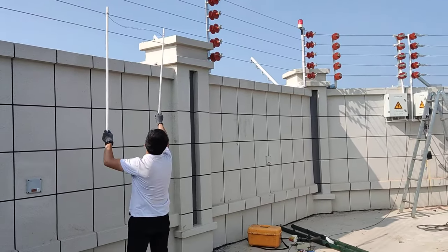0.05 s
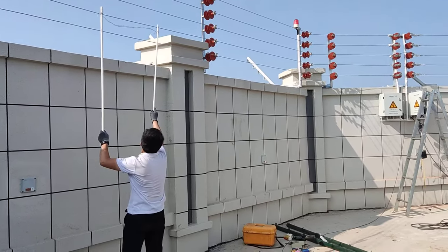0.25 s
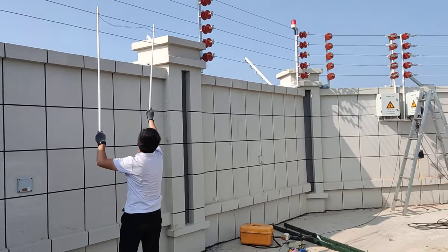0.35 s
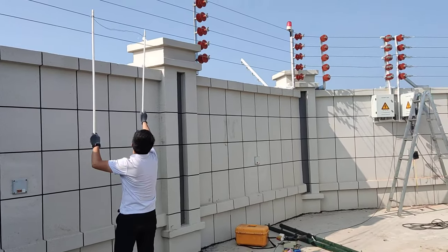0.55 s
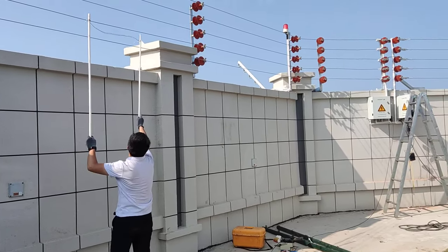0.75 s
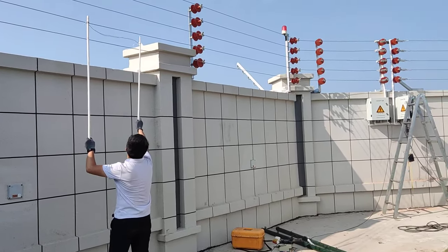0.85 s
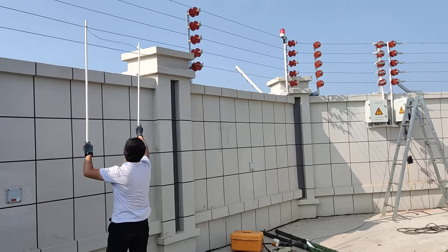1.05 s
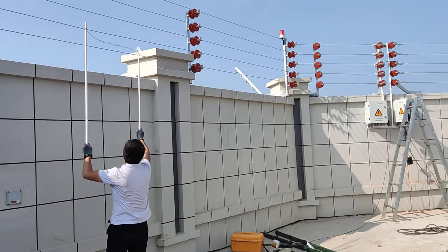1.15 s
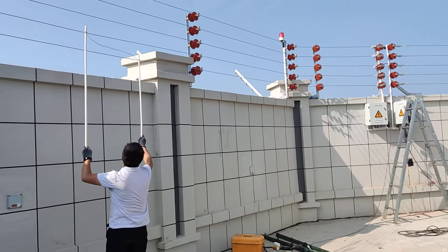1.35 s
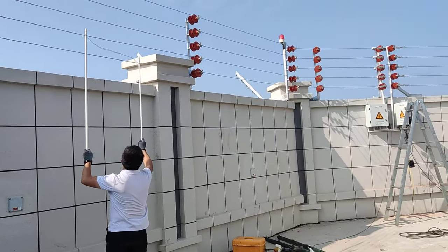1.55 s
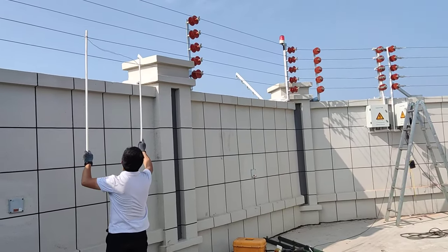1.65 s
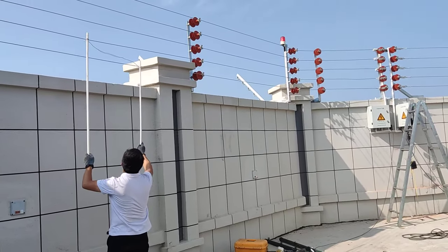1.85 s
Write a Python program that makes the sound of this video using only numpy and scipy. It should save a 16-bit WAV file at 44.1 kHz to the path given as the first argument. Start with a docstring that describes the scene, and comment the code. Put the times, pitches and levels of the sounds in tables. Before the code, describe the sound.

An electric fence wire crackles briefly with sparks while wind buffets the microphone.

```python
"""Arcing fence wire in wind.

A fence wire on top of a tiled yard wall arcs for a moment: a short volley of sparks, each echoed
by wall and ground. Gusts buffet the two microphone ports of a phone separately, over a faint
outdoor hiss. The phone's limiter holds down the loudest peaks."""
import sys
import numpy as np
from scipy import signal
from scipy.fft import rfft, irfft
from scipy.io import wavfile
from scipy.ndimage import uniform_filter1d, minimum_filter1d

SR = 44100
rng = np.random.default_rng(int(sys.argv[2]) if len(sys.argv) > 2 else 0)


def wrap_up_sound(samples):
    """Save the sound to the file named by the first command line argument, as 16-bit audio."""
    columns = np.atleast_2d(samples).T
    # keep every value between -1 and 1, then stretch to whole-number steps
    tamed = np.clip(columns, -1, 1)
    steps = np.round(tamed * 32767).astype(np.int16)
    wavfile.write(sys.argv[1], SR, steps)


N = 83790
LEFT, RIGHT = 0, 1


def undb(db):
    """dB to gain."""
    return 10 ** (np.asarray(db) / 20)


def curve(table, t, column=1):
    """One column of a time table, linearly interpolated."""
    rows = np.array(table, float)
    return np.interp(t, rows[:, 0], rows[:, column])


def colour(table, hz):
    """Gain from (Hz, dB) points on a log-frequency axis."""
    rows = np.array(table, float)
    return undb(np.interp(np.log(np.maximum(hz, 1)), np.log(rows[:, 0]), rows[:, 1]))


def walk(rate_hz, size):
    """Random wander, spread near 1."""
    hold = max(int(SR / rate_hz), 1)
    steps = np.repeat(rng.standard_normal(size // hold + 1), hold)
    return np.sqrt(3 / 2) * uniform_filter1d(steps, hold)[:size]


def outdoor_hiss(port):
    """Distant hiss in three bands that flicker independently."""
    # Each row: frequency in Hz, relative level in dB.
    colour_left = [(300, 5.5), (1100, -0.5), (1500, 4), (2500, -0.5), (5800, -5), (7600, -13.5),
                   (9000, -11.5), (11000, -18.5), (15500, -20)]
    colour_right = [(300, 6), (1100, 2), (1600, 4), (2500, 7.5), (4200, 1), (5800, 6), (7600, -7),
                    (9000, -4.5), (15500, -22)]
    # Each row: time in seconds, level of the 2-12 kHz range in dB.
    level_left = [(0.02, -55.5), (0.4, -50.5), (0.6, -53), (1.05, -51), (1.55, -55.5), (1.88, -53)]
    level_right = [(0.02, -48.5), (0.15, -46), (0.24, -45), (0.4, -53), (0.6, -48), (0.73, -52),
                   (0.85, -50), (1.88, -48)]
    shape, level = (colour_left, level_left) if port == LEFT else (colour_right, level_right)
    flicker_db = 1.0
    hz = np.arange(N // 2 + 1) * SR / N
    spectrum = rfft(rng.standard_normal(N)) * colour(shape, hz) * hz / (hz + 100)
    spectrum *= N / np.sqrt(2 * np.sum(np.abs(spectrum[(hz > 2000) & (hz < 12000)]) ** 2))
    band = np.digitize(hz, [2000, 7000])
    hiss = sum(irfft(spectrum * (band == k), N) * undb(flicker_db * walk(8.25, N)) for k in range(3))
    return hiss * undb(curve(level, np.arange(N) / SR))


def wind(port):
    """Eddies as smooth pressure bumps, narrower in strong gusts; the port sheds deep bass and treble."""
    # Each row: time in seconds, gust level in dB, eddy half-width in ms.
    gusts_left = [(0.0, -29, 3.2), (0.105, -25.5, 1.9), (0.155, -34.5, 2.5), (0.22, -35, 1.3),
                  (0.269, -16, 2.3), (0.314, -20.5, 0.83), (0.369, -33, 1.4), (0.404, -13.5, 1.17),
                  (0.444, -33, 1), (0.469, -15.5, 1.6), (0.494, -39, 1.9), (0.574, -22, 1.9),
                  (0.624, -29, 1.8), (0.644, -22, 0.7), (0.698, -40, 4.1), (0.753, -36, 7),
                  (0.828, -14, 1.7), (0.873, -27.5, 1.55), (0.978, -23.5, 1.24), (1.048, -16.5, 1.53),
                  (1.162, -32, 2.4), (1.262, -20, 1.8), (1.297, -38.5, 1.8), (1.342, -50, 3.3),
                  (1.392, -31, 2.0), (1.467, -26.5, 2.2), (1.522, -43, 3.4), (1.586, -30, 3.2),
                  (1.676, -44.5, 3), (1.796, -32, 2.4), (1.831, -19.5, 1.7), (1.866, -33, 2.5),
                  (1.896, -26.5, 2.1)]
    gusts_right = [(0.0, -32.5, 1.6), (0.125, -41, 3.9), (0.155, -23, 3.4), (0.185, -38.5, 1.8),
                   (0.215, -24.5, 0.54), (0.244, -31, 1.8), (0.27, -13.5, 2.8), (0.309, -6.5, 0.49),
                   (0.337, -15.5, 0.51), (0.352, -8, 0.42), (0.365, -21.5, 0.77), (0.378, -10.5, 0.59),
                   (0.399, -15.5, 0.49), (0.439, -5.5, 0.41), (0.456, -17.5, 0.52), (0.466, -9, 0.64),
                   (0.49, -10, 0.65), (0.515, -19.5, 1.24), (0.55, -12, 1.1), (0.574, -23.5, 1.2),
                   (0.597, -12, 0.67), (0.619, -20, 1.13), (0.639, -5.5, 0.66), (0.703, -9, 0.43),
                   (0.733, -5.5, 0.51), (0.788, -27, 1.2), (0.803, -7, 0.59), (0.816, -14.5, 0.85),
                   (0.868, -30.5, 2.1), (0.888, -21.5, 1.5), (0.95, -28, 1.3), (0.962, -14, 0.7),
                   (0.985, -13, 0.6), (1.035, -16, 0.85), (1.058, -23.5, 2.7), (1.17, -30, 2.0),
                   (1.184, -15, 0.6), (1.217, -3, 0.48), (1.238, -22, 0.98), (1.267, -24, 2),
                   (1.292, -28.5, 2.4), (1.332, -25, 1.3), (1.382, -22.5, 2.7), (1.418, -17, 1.1),
                   (1.457, -31, 4.7), (1.502, -41.5, 2.7), (1.596, -20.5, 3.1), (1.626, -31, 2),
                   (1.706, -26.5, 2.45), (1.731, -36.5, 3), (1.796, -37, 2.2), (1.896, -33, 2.4)]
    # Sharpest single buffets. Each row: time in seconds, unfiltered peak in dB, half-width in ms.
    buffets_right = [(0.206, -9.5, 0.62), (0.2237, -6.5, 0.51), (0.269, -6.5, 0.76), (.305, -5, 0.38),
                     (0.33, 2, 0.19), (0.3455, 2, 0.35), (0.4156, 1.5, 0.5), (0.4358, -1.5, 0.22),
                     (0.4495, 3, 0.32), (0.5012, -6.5, 0.56), (0.5908, -3.5, 0.64), (0.603, -7.5, 0.48),
                     (0.6345, -8, 0.64), (0.6702, -1, 0.37), (.715, -4.5, 0.26), (0.8048, -4.5, 0.45),
                     (0.9589, -12, 0.7), (0.9849, -6, 0.6), (1.0263, -4, 0.54), (1.2033, 3, 0.61),
                     (1.2222, 7.5, 0.41), (1.4266, -12.5, 0.81)]
    gusts, buffets = (gusts_left, []) if port == LEFT else (gusts_right, buffets_right)
    eddies_per_s, width_spread, scatter_db = 750, .15, 2.5
    flutter_db, flutter_hz = 1.5, 45
    port_hz, port_leak, port_damping, top_hz = 105, .36, 1.66, 2300

    count = int(eddies_per_s * N / SR)
    jitter, strength = rng.random((count, 2)).T
    stretch, polarity = rng.standard_normal((count, 2)).T
    when_s = (np.arange(count) + jitter) / eddies_per_s
    width_s = np.clip(curve(gusts, when_s, column=2), .15, 4) / 1000 * np.exp(width_spread * stretch)
    energy = eddies_per_s * np.pi * width_s / 2 * np.exp(-2 * np.pi * width_s * port_hz)
    eddy_db = curve(gusts, when_s) - scatter_db * np.log(1 - strength)
    height = undb(eddy_db) * np.sign(polarity) / np.sqrt(2 * energy)
    height *= undb(flutter_db * walk(flutter_hz, N + SR)[(when_s * SR).astype(int)])

    buffet_s, buffet_db, buffet_ms = np.array(buffets, float).reshape(-1, 3).T
    when_s = np.r_[when_s, buffet_s]
    height = np.r_[height, undb(buffet_db)]
    width_s = np.r_[width_s, buffet_ms / 1000]

    reach = 700  # samples each side of a bump
    span = np.arange(-reach, reach + 1)
    bumps = height[:, None] / (1 + (span / SR / width_s[:, None]) ** 2) * np.hanning(len(span))
    at = (when_s * SR).astype(int)[:, None] + span + reach
    pressure = np.bincount(at.ravel(), bumps.ravel(), N + 2 * len(span))
    pressure = signal.sosfiltfilt(signal.butter(2, top_hz, fs=SR, output="sos"), pressure)
    w = 2 * np.pi * port_hz
    highpass = signal.bilinear([1, port_leak * w, 0], [1, port_damping * w, w ** 2], SR)
    return signal.lfilter(*highpass, pressure)[reach:N + reach]


def yard_tail():
    """Spectrum of the yard's patchy, dying reverberation."""
    level_db, patchy_db, build_s = -27.5, 2.0, .005
    low_t60_s, treble_t60_s = .18, .17
    t = np.arange(SR // 2) / SR
    noise = rng.standard_normal(len(t)) * undb(level_db + patchy_db * walk(900, len(t)))
    noise *= np.minimum(1 / 3 + t / build_s, 1)
    low = signal.sosfilt(signal.butter(2, 7000, fs=SR, output="sos"), noise)
    treble = noise - low
    return rfft(low * undb(-60 * t / low_t60_s) + treble * undb(-60 * t / treble_t60_s), N)


def sparks(port):
    """The volley: the arc jumps about, so each crack has its own spectral ripple and echoes."""
    # Each row: start in seconds, then relative levels in dB: left port, right port, echoes, bass.
    volley = [(1.1003, -15, -16, 0, -30), (1.1098, -9.5, -8, -1, -14), (1.1203, -8, -11, -3, -34),
              (1.1598, -11, -13, 2, -28), (1.1698, -1.5, -6.5, -5, -34), (1.1817, -9, -6, 5, -14),
              (1.1910, -1.5, -.5, -1, -28), (1.2040, -23, -27, -2, -34), (1.2122, -3, -.5, 2, -24),
              (1.2249, -20, -17, -2, -34), (1.2299, -19, -22, -1, -34), (1.2667, -19, -18, -4, -34)]
    # Each row: frequency in Hz, relative level in dB.
    crack_colour = [(1000, -14), (3200, -12.5), (4600, -8.5), (7000, -8.5), (9000, -4.5), (11000, -9.5),
                    (14500, -7), (16000, -17)]
    # Direct path first, then wall and ground echoes. Each row: delay in ms, relative level in dB.
    paths_left = [(0, 0), (4.03, -9), (4.75, -10), (5.19, 2), (5.36, -4), (8.1, -15), (8.3, -11)]
    paths_right = [(.16, 0), (.42, -8), (4.7, -9), (4.95, -7), (5.6, -2), (5.76, 0), (6.47, -6)]
    paths, echo_cut_hz, bass_trim_db = (paths_left, 2860, 0) if port == LEFT else (paths_right, 1960, -9)
    volley_db, ripple_db, bass_hz, direct_cut_hz = 3, 2.2, 2040, 5000
    echo_shift_ms, echo_scatter_db = .06, 2.0

    hz = np.arange(N // 2 + 1) * SR / N
    shape = colour(crack_colour, hz)
    shape /= shape.mean()
    bass_shape = 10 / (1 + (hz / bass_hz) ** 2) * hz / (hz + 300)
    direct_highpass = hz ** 4 / (hz ** 4 + direct_cut_hz ** 4)
    echo_highpass = hz ** 2 / (hz ** 2 + echo_cut_hz ** 2)

    def delay(ms):
        return np.exp(-2j * np.pi * hz * ms / 1000)

    draws = rng.standard_normal((len(volley), 3, 12))
    tail, spectrum = yard_tail(), 0
    for (start_s, *port_db, echo_db, bass_db), (ripple, shifts, scatters) in zip(volley, draws):
        crack = shape * undb(ripple_db * np.interp(hz, np.linspace(0, SR / 2, len(ripple)), ripple))
        bass = undb(bass_db + bass_trim_db) * bass_shape
        direct = (crack * direct_highpass + bass) * delay(paths[0][0])
        echoes = sum(undb(db + echo_scatter_db * scatter) * delay(ms + echo_shift_ms * shift)
                     for (ms, db), shift, scatter in zip(paths[1:], shifts, scatters))
        reflected = undb(echo_db) * (echoes + tail) * crack * echo_highpass
        spectrum += undb(port_db[port] + volley_db) * (direct + reflected) * delay(1000 * start_s)
    return irfft(-spectrum * np.exp(0.6j), N)  # phase turn: lopsided pulses


def scene():
    """Sparks, wind and hiss, separately at each port."""
    return np.array([sparks(port) + wind(port) + outdoor_hiss(port) for port in (LEFT, RIGHT)])


def record(dry):
    """The phone's limiter turns each channel down around the loudest peaks; the top is cut."""
    ceiling, limit_s, top_hz = .95, .006, 16100
    size = int(limit_s * SR)
    needed = ceiling / np.maximum(np.abs(dry), ceiling)
    held = minimum_filter1d(needed, size=2 * size + 1)
    gain = uniform_filter1d(uniform_filter1d(held, size=size), size=size)
    return signal.sosfilt(signal.ellip(8, .2, 70, top_hz, fs=SR, output="sos"), dry * gain)


dry = scene()
out = record(dry)
wrap_up_sound(out)
```